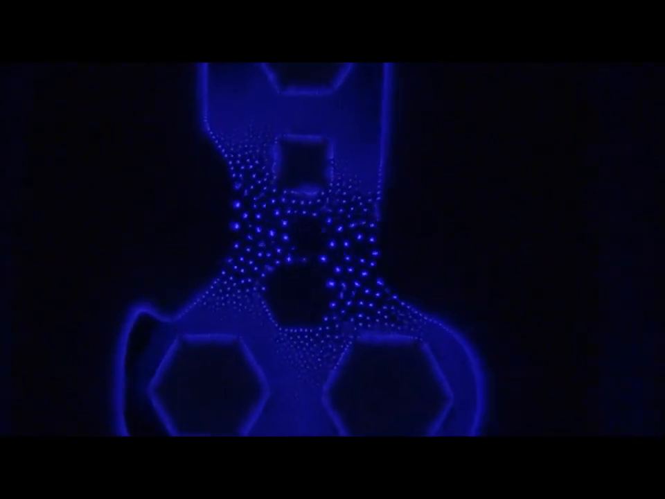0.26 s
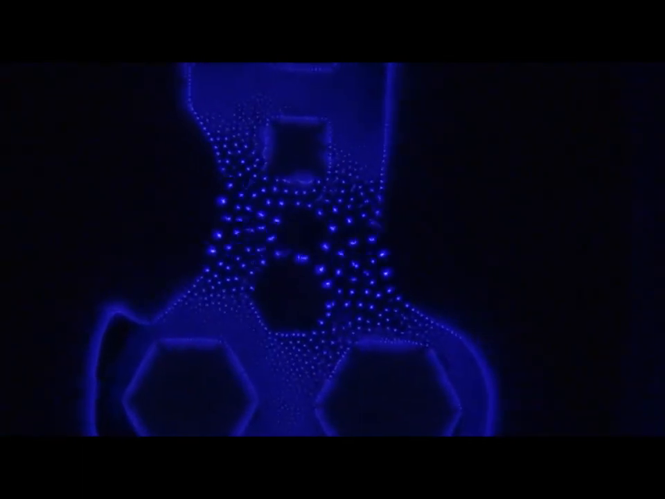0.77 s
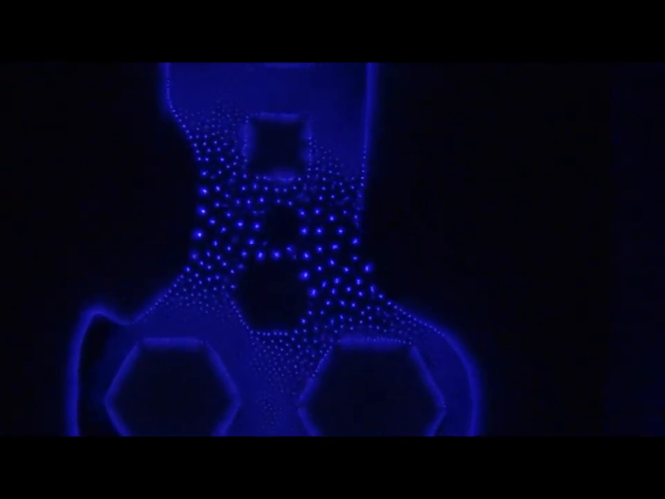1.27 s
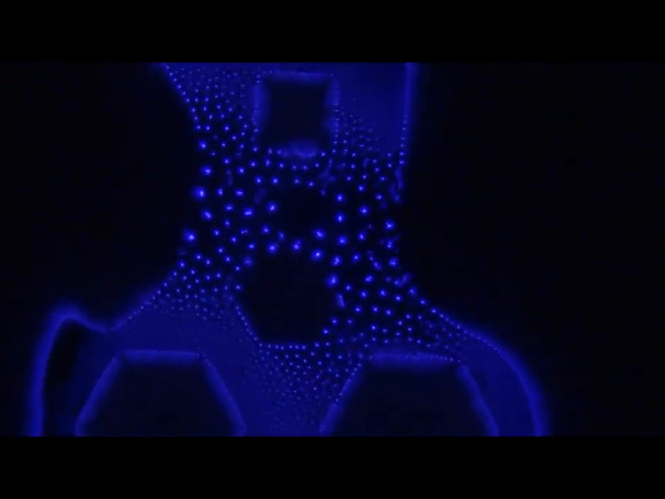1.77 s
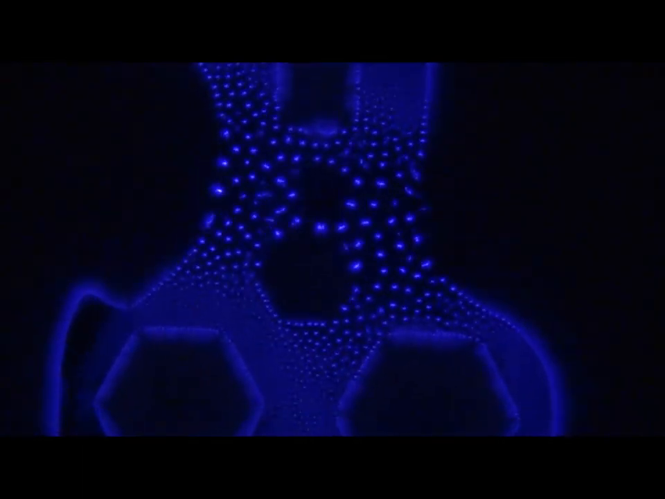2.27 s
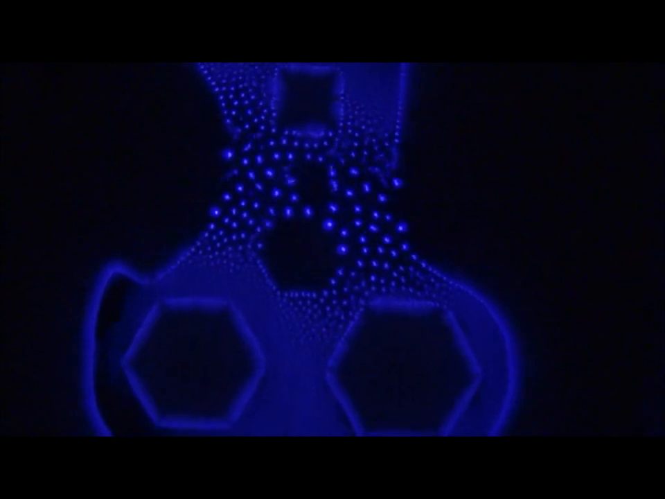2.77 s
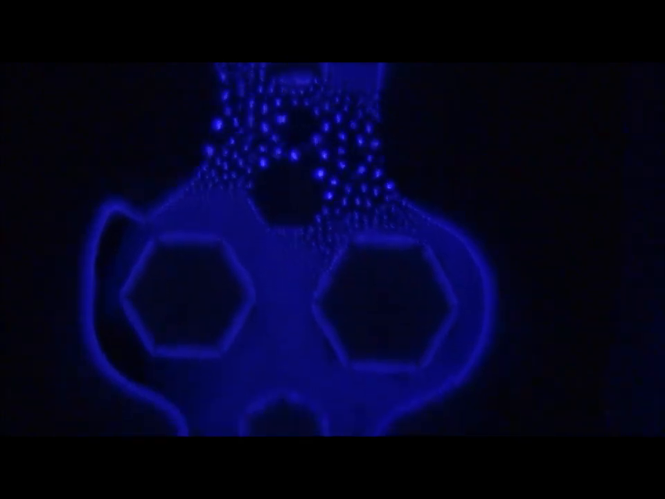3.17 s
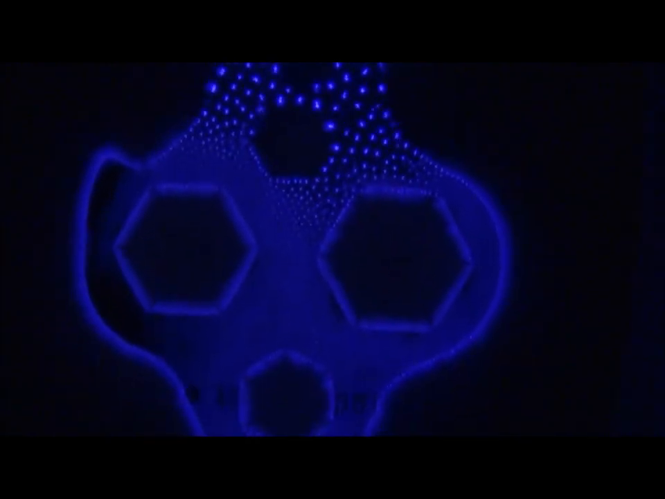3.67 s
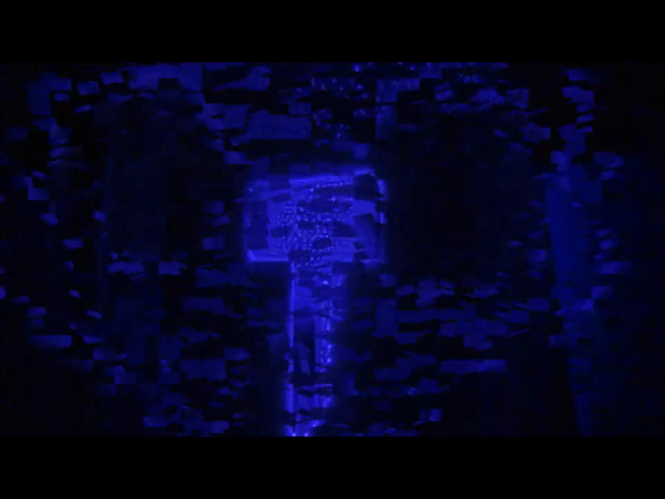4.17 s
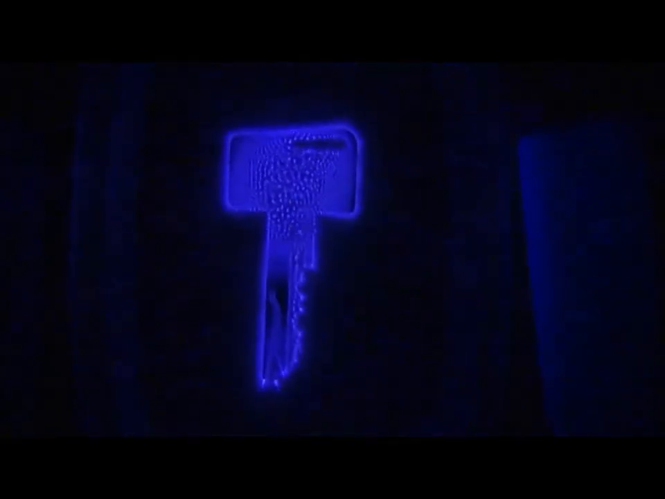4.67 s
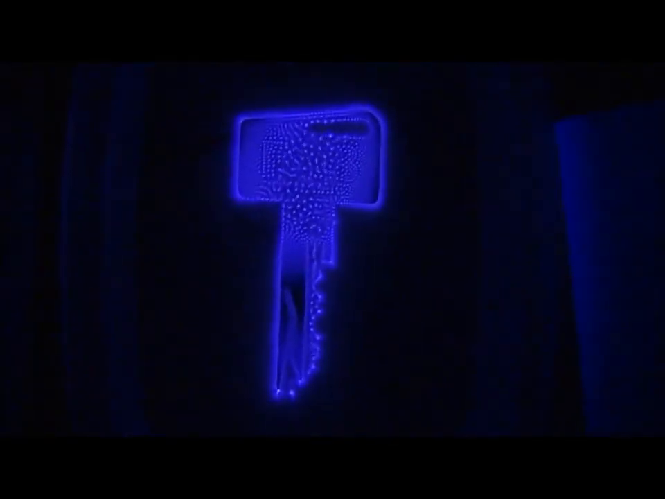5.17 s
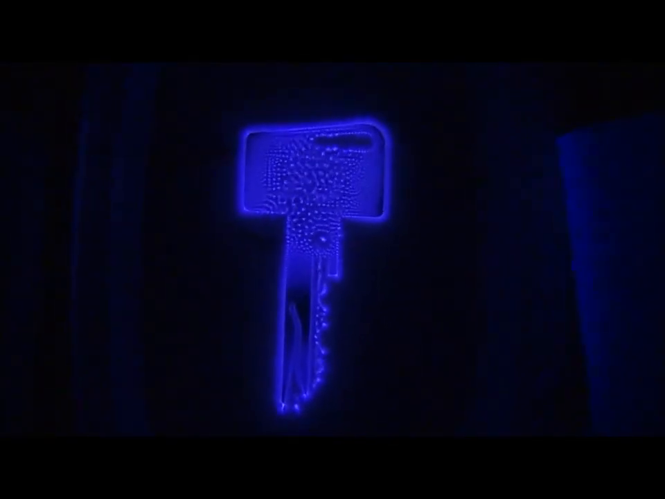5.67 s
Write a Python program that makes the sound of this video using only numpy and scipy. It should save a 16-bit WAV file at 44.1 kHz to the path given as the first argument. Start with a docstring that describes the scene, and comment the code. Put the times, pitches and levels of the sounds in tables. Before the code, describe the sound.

From the start, a high-voltage discharge around a flat metal tool gives a continuous dry sizzle, nearly even, with fine grain, slight flicker and a faint buzzing throb at about 100 per second. Close reflections colour it with a hollow, comb-like tone. Underneath are a low fan hum near 50 hertz, creeping upward, weak wavering electrical hums and room rumble. Camera handling adds tiny dry ticks: a sharp one at 0.5 s, several between 1.2 and 1.65, more around 2.1, 2.4, 2.8 and 3.3, with soft rubs near 1.4 and 2.4. From about 3 s the hiss colour shifts subtly as the camera tilts. At 4.1 s a second discharge, around a key, enters abruptly, thickening the hiss. The first drops out at 4.9 s, leaving a brighter, crisper sizzle to the end near 6 s, with faint touches around 5.2 and 5.45. The top treble is missing.

```python
"""A corona discharge sizzles between a metal object and a plate, first under a flat tool, then under a key;
the two scenes overlap for most of a second. The discharge is noise whose amplitude throbs with the rectified
mains, comb-filtered by near reflections. Below it are fan tones at multiples of a rising speed, steady hums
as wavering sinusoids, room air as filtered noise, and band-limited ticks and rubs of the hand-held camera body."""
import sys
import numpy as np
from scipy import signal
from scipy.fft import rfft, irfft, next_fast_len
from scipy.io import wavfile
from scipy.ndimage import map_coordinates

SR = 44100
rng = np.random.default_rng(int(sys.argv[2]) if len(sys.argv) > 2 else 0)


def materialize(psi):
    """Save the field psi as 16-bit PCM at rate SR to the path in sys.argv[1].

    A 1-D psi becomes a single channel; in a 2-D psi each row is a channel.
    """
    bounded = np.clip(np.atleast_2d(psi).T, -1, 1)
    quanta = np.round(bounded * 32767).astype(np.int16)
    wavfile.write(sys.argv[1], SR, quanta)


def linear_from_db(decibels):
    """Turn decibels (scalar or array-like) into linear amplitude factors; 0 gives 1."""
    return 10 ** (np.asarray(decibels, float) / 20)


N = 260631

TOOL_SPAN_S, KEY_SPAN_S = (-1, 4.9), (4.123, 7)   # gate of each scene: (start_s, end_s)
RIPPLE_HZ = 100.02   # twice the mains frequency

# Direct discharge spectrum before modulation, tilt gain and pan:
# freq_hz, level_db_per_hz, for the tool also tilted_level_db_per_hz (camera tilted down)
TOOL_SPECTRUM = [(600, -104, -104), (1000, -102, -96), (1530, -90.5, -90), (2003, -82, -82),
                 (2400, -68.5, -67.5), (2700, -71.5, -70), (3200, -77, -77), (4560, -72.5, -71),
                 (5240, -70.5, -69.5), (7860, -70.5, -71.5), (10100, -71.5, -71.5), (11050, -74, -77)]
KEY_SPECTRUM = [(600, -99), (1000, -88), (1500, -82), (1950, -75.5), (2400, -72), (3200, -77), (4600, -71),
                (5400, -70.5), (8000, -65.6), (10000, -66.5), (11000, -64.5)]
# Reflections off plate, bench and camera: delay_ms (no tilt), gain (ratio),
# for the tool also tilted_gain (ratio, camera tilted down)
TOOL_REFLECTIONS = [(0.2, -0.001, -0.036), (0.359, 0.147, 0.136), (0.522, 0.071, 0.154),
                    (0.645, 0.038, 0.056), (0.805, 0.058, -0.045), (1.075, -0.024, -0.036),
                    (1.28, 0.049, 0.041), (1.417, 0.168, 0.174), (1.485, -0.103, -0.051),
                    (1.585, 0.111, 0.083), (1.749, -0.039, 0.017), (2.015, -0.053, -0.038),
                    (2.28, -0.043, 0.011), (2.48, -0.035, -0.047)]
KEY_REFLECTIONS = [(0.353, 0.11), (0.535, 0.149), (0.736, -0.072), (0.92, -0.067), (1.101, -0.076),
                   (1.273, -0.076), (1.442, 0.132), (1.554, -0.054), (1.697, 0.087), (2.089, -0.043),
                   (2.472, 0.054)]
# Downward tilt of the camera: time_s, tilt (0 to 1)
TOOL_TILT = [(1.4, 0), (3.0, 0.1), (3.35, 0.8), (3.75, 1)]
KEY_TILT = [(4.1, 0)]
TILT_STRETCH = 0.032   # fraction by which full tilt lengthens every reflection path
TILT_GAIN_DB = 0.3   # discharge gain at full tilt
TOOL_PAN_DB, KEY_PAN_DB = -1.4, 1.2   # left level minus right level

# Fan rotor speed: speed_hz (turns per s at 0 s), climb_hz_per_s
TOOL_FAN = (50.3, .58)
KEY_FAN = (49.27, .42)
# Fan orders: multiple (of rotor speed), tool_level_db (rms), key_level_db (rms), levels before waver
FAN_ORDERS = [(1, -51.5, -47.5), (2, -72.5, -84), (5, -68.5, -66), (7, -65, -66.5)]
FANS_OPPOSED_S = 4.56   # odd orders of the two rotors are in antiphase here

# Steady hums: tool_pitch_hz, tool_level_db (rms), key_pitch_hz, key_level_db (rms), waver_db (spread)
HUMS = [(100, -72, 100, -67, 1.0), (120, -60, 120, -58, .6), (169.2, -67, 168.9, -69, 2.0),
        (171.5, -61.5, 170.7, -65.5, 1.5), (200, -73, 200, -66, 1.5), (471.4, -67, 469, -67, 1.5)]
HUMS_IN_STEP_S = 4.17   # all hums are in phase here

# Shape of the room rumble, alike on both sides: freq_hz, relative_level_db
RUMBLE_SHAPE = [(12, -34), (20, -8), (59, -3.5), (97, -10.5), (248, -6), (305, -13.5), (468, -13),
                (595, -30), (900, -31), (1170, -59), (1980, -120)]
# Shape of the diffuse field, one list for the tool and one for the key: freq_hz, relative_level_db
DIFFUSE_SHAPES = [(24, -36), (40, -10), (87, -9), (129, -5), (201, -7), (353, -6.5), (514, -10),
                  (1470, -13), (2470, -3.5), (3270, -4), (4650, -3.5), (7780, -3), (10800, -3.5),
                  (14000, -39), (22000, -120)], [(24, -33), (40, -1), (60, -8), (97, -13), (183, -7),
                  (1110, -14.5), (1780, -8.5), (2050, -7.5), (2650, -9.5), (3510, -6), (4230, -6),
                  (5870, -2.5), (10800, -2), (14000, -31), (22000, -120)]
RUMBLE_GAIN_DB, DIFFUSE_GAIN_DB = (-77, -75), (-83, -79.5)   # added to those shapes: (tool, key)

# Ticks in the camera body: start_s, body_peak_db, low_edge_hz, high_edge_hz
TICKS = [(0.4818, -24.5, 800, 4500), (0.487, -38, 1100, 2300), (1.184, -35, 1300, 2500),
         (1.3035, -23.5, 1100, 3500), (1.444, -33.5, 1000, 2400), (1.444, -39.5, 428, 640),
         (1.462, -40.5, 600, 1800), (1.6395, -28, 1150, 2500), (1.645, -26, 1150, 4200),
         (2.094, -29, 1000, 2400), (2.1333, -26.5, 400, 2800), (2.376, -43, 500, 1800),
         (2.411, -35, 500, 2000), (2.819, -37, 1200, 2600), (2.83, -29, 1250, 3300),
         (3.282, -36.5, 550, 2000), (4.21, -35, 1200, 2500), (5.206, -39.5, 734, 940),
         (5.214, -43, 740, 960), (5.448, -38, 1050, 1700)]
# Soft rubs of a finger on the body: start_s, body_peak_db, low_edge_hz, high_edge_hz
RUBS = [(1.409, -41.5, 404, 1800), (2.368, -43, 260, 900), (5.21, -40, 270, 1200)]
TICK_MS, RUB_MS = (0.22, 6.6), (2.5, 39)   # (rise, time in which the decay falls to exp(-2))
CRACK_BAND_HZ = (1430, 7500)
# Crack level against body, growing with a high edge above CRACK_FROM_HZ
CRACK_DB, CRACK_DB_PER_OCTAVE, CRACK_FROM_HZ = -7, 15.5, 2300
THIN_SHELL = 0.82   # share of the lows that the thin shell fails to radiate

# Band limit of a low sampling rate: freq_hz, gain_db
BAND_LIMIT = [(1, 0), (10990, 0), (11030, -12), (11120, -55), (11300, -90)]


def in_time(rows):
    """Linear interpolation: the columns of a time table become one value a sample."""
    s, *columns = np.transpose(rows)
    return [np.interp(np.arange(N) / SR, s, column) for column in columns]


def coloured(white, spectrum):
    """Linear filtering: unit white noise is given a spectral density in dB per Hz."""
    hz, db = np.transpose(spectrum)
    size = next_fast_len(N)
    grid_hz = np.maximum(np.arange(size // 2 + 1) * SR / size, 1)
    gain = linear_from_db(np.interp(np.log(grid_hz), np.log(hz), db)) * np.sqrt(SR / 2)
    return irfft(rfft(white, size) * gain, size)[..., :N]


def drift(rate_hz):
    """Low-pass filtered noise: a slow random fluctuation of unit spread."""
    hop = 40   # samples between computed points
    pole = np.exp(-2 * np.pi * rate_hz / SR * hop)
    noise = rng.standard_normal(N // hop + 3002)
    slow = signal.lfilter([1], [1, -2 * pole, pole * pole], noise)[3000:]   # settled part
    return np.interp(np.arange(N) / hop, np.arange(len(slow)), slow / slow.std())


def corona(spectrum, reflections, tilting, pan_db, ripple, ripple_phase):
    """Amplitude modulation and comb filtering: streamers merge to a hiss swelling each mains half cycle."""
    tilt = np.clip(in_time(tilting)[0], 0, 1)
    throb = 1 + ripple * np.cos(2 * np.pi * RIPPLE_HZ * np.arange(N) / SR + ripple_phase)

    sizes = linear_from_db(rng.exponential(1, N)) * rng.standard_normal(N)
    flicker = linear_from_db(0.4 * drift(30) + 0.23 * drift(3.9))
    streamers = sizes / sizes.std() * throb * flicker

    table = np.array(spectrum)
    level = coloured(streamers, table[:, :2])
    tilted = coloured(streamers, table[:, [0, -1]])
    direct = (1 - tilt) * level + tilt * tilted

    hiss = direct.copy()
    for delay_ms, *gains in reflections:
        gain = gains[0] + tilt * (gains[-1] - gains[0])
        lag = delay_ms * (1 + TILT_STRETCH * tilt) * SR / 1000
        hiss += gain * map_coordinates(direct, [np.arange(N) - lag], order=3, mode="wrap")
    side_db = pan_db * np.array([[0.5], [-0.5]])
    return hiss * linear_from_db(TILT_GAIN_DB * tilt + side_db), throb


def fan(speed, which):
    """Harmonic series: rotor unbalance and blade tones lie on multiples of a steadily climbing speed."""
    start_hz, climb = speed
    turns = np.cumsum(start_hz + climb * np.arange(N) / SR) / SR
    turns = turns - turns[round(FANS_OPPOSED_S * SR)] + which / 2
    tones = 0
    for multiple, *levels_db in FAN_ORDERS:
        level = linear_from_db(levels_db[which] + 0.5 * drift(4.3))
        tones = tones + level * np.sqrt(2) * np.sin(2 * np.pi * multiple * turns)
    return tones


def hums(which):
    """Superposition: transformer and motor tones elsewhere in the room waver independently."""
    t = np.arange(N) / SR - HUMS_IN_STEP_S
    tones = 0
    for row in HUMS:
        hz, level_db = row[2 * which:2 * which + 2]
        level = linear_from_db(level_db + row[-1] * drift(3.6))
        tones = tones + level * np.sqrt(2) * np.cos(2 * np.pi * hz * t)
    return tones


def room(which, throb):
    """Diffuse field: rumble common to both ports, and unlike noise with hiss returned by the walls."""
    rumble = linear_from_db(RUMBLE_GAIN_DB[which]) * coloured(rng.standard_normal(N), RUMBLE_SHAPE)
    noise = rng.standard_normal((2, N)) * np.sqrt(throb)
    air = linear_from_db(DIFFUSE_GAIN_DB[which]) * np.sqrt(2) * coloured(noise, DIFFUSE_SHAPES[which])
    return rumble + air


def handling(events, rise_ms, length_ms):
    """Contact excitation: a touch is a decaying band of scratch noise, plus a crack unlike at the ports."""
    length = 4000
    out, t_ms = np.zeros((2, N)), np.arange(length) / SR * 1000
    crack_band = signal.butter(2, CRACK_BAND_HZ, "band", fs=SR, output="sos")
    scratches = rng.standard_normal((len(events), 5, length))
    for (start_s, peak_db, low_hz, high_hz), scratch in zip(events, scratches):
        scratch[[0, 3, 4], 8] = 7.5   # a sharp first contact
        scratch = scratch * np.exp(-t_ms / length_ms * 2) * np.minimum(t_ms / rise_ms, 1)

        body_band = signal.butter(4, [low_hz, high_hz], "band", fs=SR, output="sos")
        # one part common to both ports, one part of each port alone
        body = signal.sosfilt(body_band, scratch[0] + 0.86 * scratch[1:3])
        body = signal.lfilter([1, -THIN_SHELL], [1], body)

        crack = signal.sosfilt(crack_band, scratch[3:])
        octaves = max(np.log2(high_hz / CRACK_FROM_HZ), 0)
        crack_db = peak_db + CRACK_DB + CRACK_DB_PER_OCTAVE * octaves

        at = round(start_s * SR)
        out[:, at:at + length] += linear_from_db(peak_db) * body / np.abs(body).max()
        out[:, at:at + length] += linear_from_db(crack_db) * crack / np.abs(crack).max()
    return out


def heard(span_s, fade_ms):
    """Linear gating: a scene fades in and out at the ends of its span."""
    t = np.arange(N) / SR
    return np.clip(np.minimum(t - span_s[0], span_s[1] - t) * 1000 / fade_ms, 0, 1)


def scene():
    """Superposition of the gated tool scene, the gated key scene and the handling."""
    tool, tool_throb = corona(TOOL_SPECTRUM, TOOL_REFLECTIONS, TOOL_TILT, TOOL_PAN_DB,
                              ripple=0.11, ripple_phase=-3.1)
    key, key_throb = corona(KEY_SPECTRUM, KEY_REFLECTIONS, KEY_TILT, KEY_PAN_DB,
                            ripple=0.12, ripple_phase=-2.5)
    tool = tool + fan(TOOL_FAN, which=0) + hums(which=0) + room(which=0, throb=tool_throb)
    key = key + fan(KEY_FAN, which=1) + hums(which=1) + room(which=1, throb=key_throb)
    scenes = tool * heard(TOOL_SPAN_S, fade_ms=10) + key * heard(KEY_SPAN_S, fade_ms=1.9)
    return scenes + handling(TICKS, *TICK_MS) + handling(RUBS, *RUB_MS)


def roll_off(x):
    """The treble ends steeply here."""
    return signal.sosfilt(signal.butter(12, 12310, fs=SR, output="sos"), x)


def record(dry):
    """Band limiting: a low sampling rate ends the treble like a wall."""
    mix = coloured(dry, BAND_LIMIT) / np.sqrt(SR / 2)   # undo the density scaling
    return roll_off(mix)


dry = scene()
out = record(dry)
materialize(out)
```